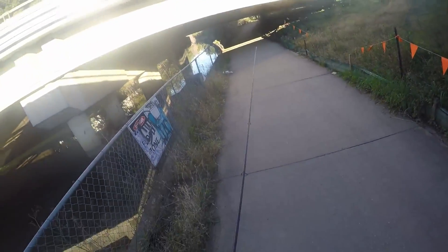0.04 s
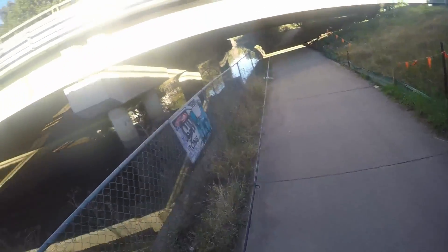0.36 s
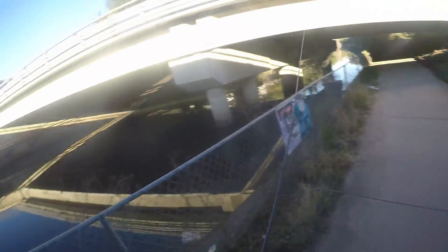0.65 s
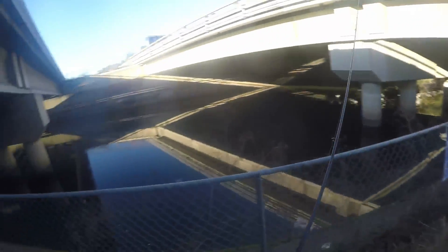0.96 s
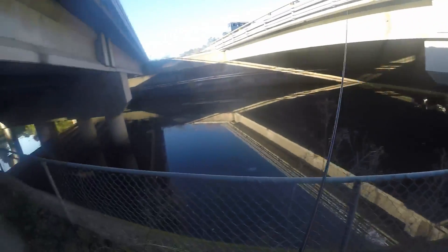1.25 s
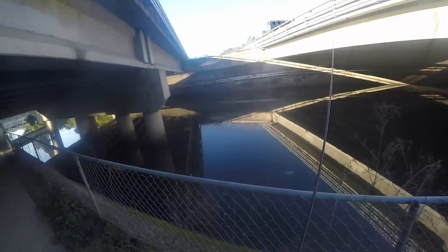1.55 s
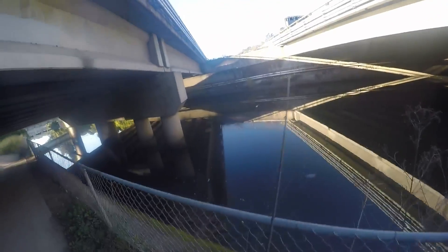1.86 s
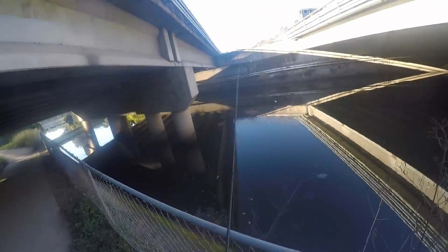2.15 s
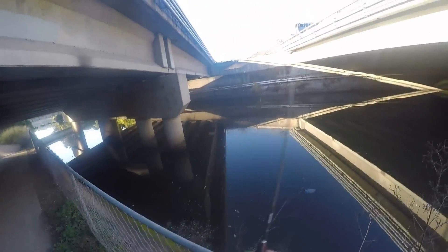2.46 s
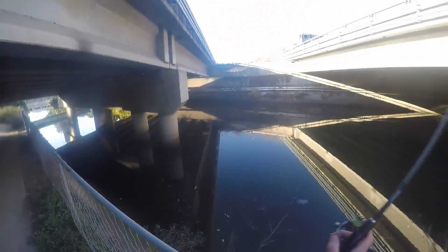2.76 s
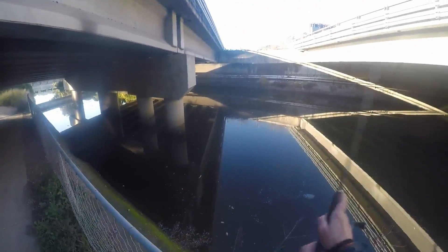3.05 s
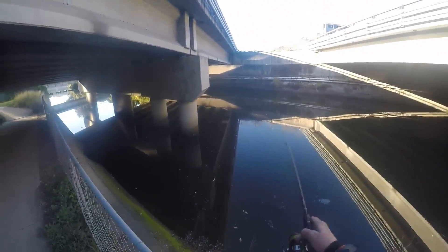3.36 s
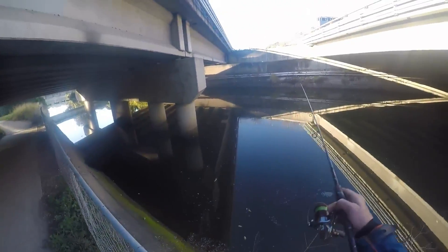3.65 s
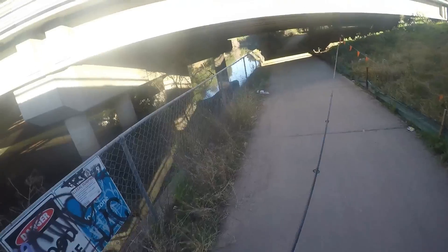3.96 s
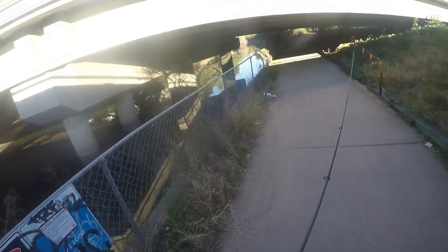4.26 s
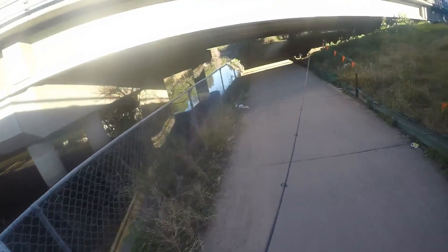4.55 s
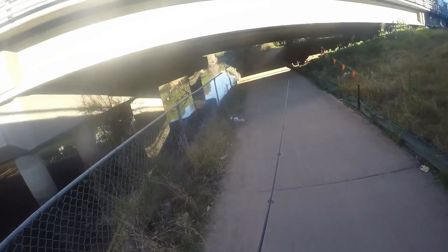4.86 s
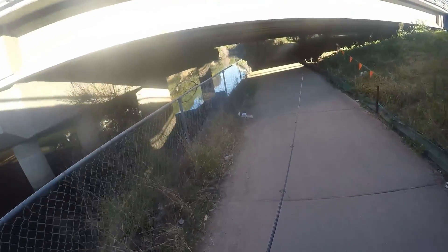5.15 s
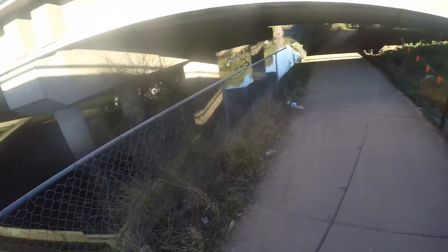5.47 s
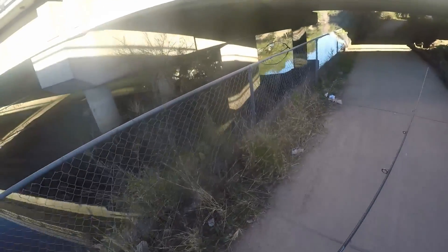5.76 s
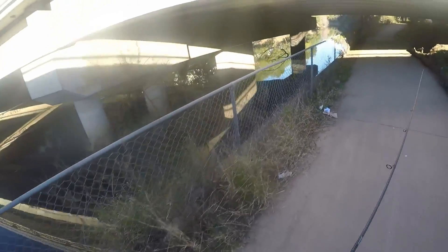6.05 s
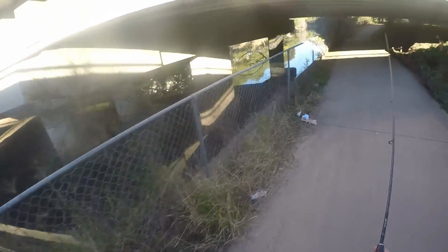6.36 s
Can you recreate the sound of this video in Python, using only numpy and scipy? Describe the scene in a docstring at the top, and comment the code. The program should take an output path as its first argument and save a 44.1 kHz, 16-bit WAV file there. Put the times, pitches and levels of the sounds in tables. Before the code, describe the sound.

Road traffic rumbles and roars on a bridge overhead as a droning truck passes, with one sharp click midway.

```python
"""Under a concrete road bridge

Traffic crosses above a path: the deck rumbles and booms, tyres roar and hiss. A truck passes overhead
on singing tyres, its exhaust droning on beside a slower lorry's. Nearby, fishing tackle ticks, line
runs off a reel and shoes scuff. The sound cuts out for an instant and comes back with a sharp click."""
import sys
import numpy as np
from scipy import signal
from scipy.fft import rfft, irfft, next_fast_len
from scipy.io import wavfile
from scipy.ndimage import uniform_filter1d, map_coordinates

SR = 44100
rng = np.random.default_rng(int(sys.argv[2]) if len(sys.argv) > 2 else 0)


def unload_wav(signal):
    """Save mono or channel-first audio to the path in sys.argv[1] as 16-bit WAV at rate SR, clipped to [-1, 1]."""
    wavfile.write(
        sys.argv[1],
        SR,
        np.round(np.clip(np.atleast_2d(signal).T, -1, 1) * 32767).astype(np.int16),
    )


N = 291501

SOUND_M_PER_S = 343
TRUCK_S, TRUCK_M_PER_S, TRUCK_M = 3.92, 18, 9  # time overhead, speed, least distance


def amp(db):
    """Decibels to gain."""
    return 10 ** (np.asarray(db) / 20)


def unit(x):
    """Scale to rms 1."""
    return x / np.sqrt(np.mean(x ** 2) + 1e-20)


def clock():
    """The time of every sample in seconds."""
    return np.arange(N) / SR


def fader(rows):
    """Straight ramps between (time, level) points."""
    return np.interp(clock(), *np.transpose(rows))


def swell(s, half_width):
    """A bell-shaped rise and fall around time s."""
    return np.exp(-((clock() - s) / half_width) ** 2)


def swells(rows):
    """A gain envelope with one swell per (t/s, level/dB, half-width/s) row."""
    return sum(amp(db) * swell(s, half_width) for s, db, half_width in rows)


def wobble(rate):
    """A smooth random curve, rate knots a second."""
    return map_coordinates(rng.standard_normal(int(N * rate / SR) + 4), [clock() * rate])


def filtered(x, response):
    """Equalise x with a gain that is a function of frequency."""
    size = next_fast_len(N + SR // 2)
    return irfft(rfft(x, size) * response(np.fft.rfftfreq(size, 1 / SR)), size)[:N]


def rush(colour, patchy_db):
    """Noise of rms 1 and the given (f/Hz, level/dB) colour, with random patches of +/- patchy_db."""
    bins = signal.stft(rng.standard_normal(N), nperseg=1024)[2]
    patches = uniform_filter1d(rng.standard_normal(bins.shape), size=5, axis=0)
    patches = uniform_filter1d(patches, size=10, axis=1)
    noise = signal.istft(bins * amp(patchy_db * unit(patches)), nperseg=1024)[1][:N]
    f, db = np.transpose(colour)
    return unit(filtered(noise, lambda hz: amp(np.interp(np.log(hz + 1), np.log(f), db))))


def tones(pitch_hz, partials, scatter, rate):
    """(Ratio, dB) partials on a moving pitch; echoes off the concrete add a wandering share, scatter."""
    phase = 2 * np.pi * np.cumsum(pitch_hz) / SR
    out = np.zeros(N)
    for ratio, db in partials:
        paths = 1 + scatter * (wobble(rate) + 1j * wobble(rate))
        carrier = np.exp(1j * (ratio * phase + rng.uniform(0, 2 * np.pi)))
        out += amp(db) * unit(np.real(paths * carrier))
    return out


def passing(s, m_per_s, distance_m):
    """Doppler ratio and nearness (1 when closest) of a vehicle that passes at time s."""
    along = m_per_s * (clock() - s)
    range_m = np.hypot(along, distance_m)
    return 1 - m_per_s / SOUND_M_PER_S * along / range_m, distance_m / range_m


def electronics():
    """The noise floor of the electronics: a faint, even hiss and a high whine."""
    # hiss colour: f/Hz, level/dB
    colour = [(1000, -0.5), (9000, -1.5), (13000, -2), (14500, -5), (15200, -8), (15600, -45.5)]
    hiss = amp(-72.5) * rush(colour, patchy_db=1.5)
    whine = amp(-91) * (1 + .6 * wobble(40)) * np.sin(2 * np.pi * 12851 * clock())
    return hiss + whine


def fishing_line():
    """Line whistles off the reel, sinking in pitch as it slows, then hisses out through the rod's rings."""
    # line rubbing the rings: f/Hz, level/dB
    cast_colour = [(3000, -25), (5800, 10), (8000, -6.5), (10000, -5), (15000, -11), (15600, -46)]
    whistle_s, cast_s, cast_length_s = 2.45, 3.03, 0.82
    top_hz, sag_hz_per_s = 12851, 11000
    since = clock() - whistle_s
    whistle_db = -75.5 + np.minimum(27 * since, -90 * since)  # slow rise, quick fall
    pitch_hz = np.clip(top_hz - sag_hz_per_s * since, top_hz / 2, top_hz)
    whistle = amp(whistle_db) * tones(pitch_hz, [(1, 0.0051)], scatter=10, rate=550)
    running = (clock() > cast_s) & (clock() < cast_s + cast_length_s)
    cast = running * amp(-70 + 1.6 * wobble(40)) * rush(cast_colour, patchy_db=-0.5)
    return whistle + cast


def shoes():
    """Soles scuff grit on the concrete path."""
    # scuffs: t/s, level/dB, half-width/s
    scuffs = [(5.15, -65, 0.03), (6.06, -70, 0.07), (6.444, -69, 0.03)]
    # grit colour: f/Hz, level/dB
    colour = [(2500, -20), (4500, -3), (5600, -6), (6500, -11.5), (8500, -18), (14000, -33)]
    grit = unit(amp(5 * wobble(240)) * rush(colour, patchy_db=3))
    return grit * swells(scuffs)


def tackle():
    """Small parts of rod and reel tick: each contact is a few short modes and a dry, bright snap."""
    # contacts: t/s, relative level/dB, brightness/(dB per octave), low cut/Hz, attack/s
    ticks = [(1.8583, -42, 4, 5200, .00005), (1.8593, -37, -7, 5300, .0001),
             (1.8755, -44, -3.5, 7000, .0003), (3.9123, -45, -6, 4300, .0003),
             (3.9213, -44, -6, 4300, .0004), (4.8358, -43, 3, 5200, .0002),
             (4.8364, -34.5, -3, 3800, .0006), (5.1013, -48.5, -2, 3900, .0005),
             (6.428, -47, -5, 5200, .0005), (6.455, -49, -5, 5200, .0005)]
    # modes of the parts: f/Hz, level/dB, t60/s
    modes = [(4030, -1, .008), (4400, -3, .007), (4750, -2, .009), (5100, -5, .008), (5480, -1, .014),
             (7950, -9, .006), (10400, -14, .005), (12800, -8, .005), (13600, -13, .003)]
    pivot_hz, snap_db, snap_t60 = 5000, -19, .005
    out, t = np.zeros(N + SR), np.arange(SR // 10) / SR
    for s, db, bright_db, lowest_hz, attack in ticks:
        ring = np.zeros(len(t))
        for hz, mode_db, t60 in modes:
            struck_db = mode_db + bright_db * np.log2(hz / pivot_hz) + rng.normal(0, 2.1)
            low_cut = 1 / (1 + (lowest_hz / hz) ** 20)
            ring += low_cut * amp(struck_db - 60 * t / t60) * np.sin(2 * np.pi * hz * t)
        snap = amp(snap_db + bright_db - 60 * t / snap_t60) * np.gradient(rng.standard_normal(len(t)))
        out[round(s * SR):][:len(t)] += amp(db) * (ring + snap) * (1 - np.exp(-t / attack))
    return out[:N]


def deck_rumble():
    """The flow of cars shakes the deck into a low, continuous bed."""
    # rumble colour: f/Hz, level/dB
    colour = [(5.9, -46), (10, -12.5), (43, -2), (64, 1.5), (88, -4.5), (112, -6.5), (135, -16.5),
              (220, -15.5), (290, -27), (480, -120)]
    # rumble fader: t/s, relative level/dB
    levels = [(0.0, -37.5), (0.8, -34.5), (1.2, -36.5), (1.5, -33), (2.7, -30), (3.4, -32.5), (4.0, -28),
              (6.6, -33)]
    return amp(fader(levels) + 3.5) * rush(colour, patchy_db=0)


def road_roar():
    """The road roars through the underpass as the traffic builds and eases."""
    # roar colour: f/Hz, level/dB
    colour = [(70, -38.5), (120, -1.5), (200, -1.5), (300, -2), (400, 0), (500, -2), (600, -7), (760, -15),
              (870, -21), (1120, -22), (1300, -32.5), (2000, -61.5), (14000, -62.5), (15600, -93.5)]
    # roar fader: t/s, relative level/dB
    levels = [(0.0, -34), (0.7, -35), (1.5, -32), (2.6, -28.5), (3.8, -26.5), (5.1, -31), (6.6, -28.5)]
    return amp(fader(levels) - 2) * rush(colour, patchy_db=1.25)


def tyre_hiss():
    """Tyres on concrete hiss over the parapet; their bright edge fizzes through the gap between decks."""
    # hiss, shaded by the parapet: f/Hz, level/dB
    hiss_colour = [(700, -37), (1300, 0.5), (1750, 3), (2300, 2.5), (2750, 2), (3100, 0.5), (3400, -12.5),
                   (4500, -33.5), (8000, -43.5)]
    # fizz through the gap: f/Hz, level/dB
    fizz_colour = [(2500, -20.5), (3400, 0.5), (4200, 2.5), (5000, -1.5), (6000, -8.5), (7500, -16.5),
                   (10000, -29), (15000, -40)]
    # hiss fader: t/s, relative level/dB
    levels = [(0.1, -60), (0.86, -58.5), (1.17, -55.5), (1.42, -54), (1.6, -54), (1.9, -53), (2.4, -53),
              (2.9, -52), (3.25, -52), (4.54, -57), (4.99, -57), (6.6, -54)]
    # tyres swishing past: t/s, boost/dB, half-width/s
    swishes = [(1.197, 2.4, 0.049), (1.62, 2.3, .05), (2.387, 2, .06), (3.2, 0.5, .08), (5.528, 2.5, .06)]
    hiss_db = fader(levels) + sum(db * swell(s, half_width) for s, db, half_width in swishes)
    facing_gap_db = 3.5 * swell(2.3, 0.56)  # brighter while the listener faces the gap
    fizz_db = -64 + 0.88 * (hiss_db - hiss_db.mean()) + facing_gap_db
    hiss = amp(hiss_db + 0.34 + 0.23 * wobble(12)) * rush(hiss_colour, patchy_db=1.5)
    fizz = amp(fizz_db) * rush(fizz_colour, patchy_db=1)
    return hiss + fizz


def span_heaves():
    """The span flexes under heavy loads in slow sub-bass swells."""
    # loads: t/s, level/dB, half-width/s
    loads = [(2.709, -31.5, 0.22), (4.15, -36.5, 0.25), (4.6, -31, 0.092), (5.35, -32.5, 0.37)]
    # colour of the flexing span: f/Hz, level/dB
    colour = [(15, -27.5), (26, 12.5), (44, 11.5), (54, -7), (80, -44), (160, -120)]
    return swells(loads) * rush(colour, patchy_db=-4)


def axle_booms():
    """Axles set the low modes of the deck swelling and fading."""
    # axles: t/s, level/dB, half-width/s
    axles = [(1.304, -28, 0.036), (1.643, -28, 0.066), (2.339, -26.5, 0.055)]
    # deck modes: f/Hz, relative level/dB
    modes = [(57, -8), (82, -1), (93, 1)]
    out = np.zeros(N)
    for s, db, half_width in axles:
        ring = sum(amp(level) * np.sin(2 * np.pi * (hz * clock() + rng.uniform())) for hz, level in modes)
        out += amp(db) * swell(s, half_width) * ring
    return out


def wheel_surges():
    """Short swells of roar and hollow boom as wheels cross a rough stretch."""
    # crossings: t/s, roar level/dB, boom level/dB, half-width/s
    crossings = [(0.414, -39, -62, 0.1), (2.676, -32.5, -46, 0.11), (3.244, -41, -36, 0.18),
                 (3.69, -31, -30, 0.15), (4.952, -31, -48, 0.038), (5.427, -37.5, -49, 0.25)]
    # roar of the wheels: f/Hz, level/dB
    roar_colour = [(250, -29.5), (380, 7), (490, 9), (580, -7.5), (800, -30.5), (1600, -72.5), (3000, -120)]
    # hollow boom of the span: f/Hz, level/dB
    boom_colour = [(90, -31), (128, 4), (170, -12.5), (220, -24.5), (900, -120)]
    roar_gain = swells((s, db, half_width) for s, db, _, half_width in crossings)
    boom_gain = swells((s, db, half_width) for s, _, db, half_width in crossings)
    return roar_gain * rush(roar_colour, patchy_db=1.5) + boom_gain * rush(boom_colour, patchy_db=-4.5)


def lorry_overtones():
    """Overtones of the lorry's drone swell briefly, sinking a little in pitch."""
    # swelling overtones: t/s, f/Hz, level/dB, half-width/s
    hums = [(3.28, 166, -36.5, 0.32), (5.501, 229.5, -38, 0.39), (6.198, 156.5, -34, 0.64)]
    sag_hz_per_s = 7
    out = np.zeros(N)
    for s, hz, db, half_width in hums:
        pitch_hz = hz - sag_hz_per_s * (clock() - s)
        out += amp(db) * swell(s, half_width) * tones(pitch_hz, [(1, 0)], scatter=.18, rate=8.7)
    return out


def lorry_exhaust():
    """A slower lorry drones below the truck, brighter when louder, its pitch sinking as it passes."""
    # harmonics of the firing rate, first upwards: level/dB
    harmonics = [0, -18.5, -24]
    # drone fader: t/s, relative level/dB
    levels = [(0.0, -33), (2.9, -37), (3.3, -23.5), (3.9, -27.5), (4.6, -33.5), (5.2, -25.5), (5.8, -22),
              (6.6, -24)]
    firing_hz = 78.78
    doppler, _ = passing(s=3.4, m_per_s=12, distance_m=12.6)
    drone_db = fader(levels)
    edge_db = 0.21 * (drone_db - drone_db.max())
    partials = [(k, db + edge_db * (k > 1)) for k, db in enumerate(harmonics, 1)]
    return amp(drone_db - 3.5) * tones(firing_hz * doppler, partials, scatter=.26, rate=9)


def truck_exhaust():
    """The truck's exhaust comes into the open once it has passed, sinking and dulling with distance."""
    # harmonics of the firing rate, first upwards: level/dB
    harmonics = [0, -29, -14, -18]
    firing_hz, exposed_s, rise_s = 97.84, 3.94, 0.046
    doppler, near = passing(TRUCK_S, TRUCK_M_PER_S, TRUCK_M)
    exposed = (1 + np.tanh((clock() - exposed_s) / rise_s)) / 2
    dip_db = -12.5 * swell(4.656, 0.16)  # the drone dips briefly
    gain = amp(-21 + dip_db) * exposed * near ** 0.63
    edge_db = 20 * np.log10(near)  # overtones fade faster than the fundamental
    partials = [(k, db + edge_db * (k > 1)) for k, db in enumerate(harmonics, 1)]
    return gain * tones(firing_hz * doppler, partials, scatter=0.082, rate=14)


def truck_tyres():
    """The tread sings: a clear, falling note comes in swells inside a rough whine that peaks overhead."""
    # tones from tread blocks of several lengths: pitch ratio, level/dB
    tread_tones = [(.8, -3.5), (.9, -7), (1, -2), (1.05, -7), (1.19, -10.5), (1.31, -12.5)]
    # swells of the clear note: t/s, level/dB, half-width/s
    note_swells = [(3.464, -35, .1), (3.78, -26, 0.11), (4.226, -27, 0.12), (5.549, -37.5, .5)]
    whine_hz, note_hz = 367, 366.3
    doppler, near = passing(TRUCK_S, TRUCK_M_PER_S, TRUCK_M)
    wheel_doppler, _ = passing(s=4.0, m_per_s=TRUCK_M_PER_S, distance_m=5.52)
    ahead_db = -8.5 * (clock() < TRUCK_S) * (1 - near ** 2)  # tyres radiate less forwards
    whine = tones(whine_hz * doppler, tread_tones, scatter=2.1, rate=36)
    note = tones(note_hz * wheel_doppler, [(1, 0)], scatter=.62, rate=36)
    return amp(-30 + ahead_db) * near ** 1.75 * whine + swells(note_swells) * note


def scene():
    """The mono mix on the path under the bridge."""
    bed = deck_rumble() + road_roar() + tyre_hiss()
    vehicles = truck_exhaust() + lorry_exhaust() + lorry_overtones() + truck_tyres()
    bridge = axle_booms() + span_heaves() + wheel_surges()
    foley = tackle() + fishing_line() + shoes()
    return (bed + vehicles + bridge + foley + electronics())[None]


def record(dry):
    """The signal drops out briefly and snaps back with a click; a steep low-pass trims the top."""
    gap_start_s, gap_end_s = 3.8638, 3.9085
    click_hz, click_t60, top_hz = 900, .0019, 16200
    t = clock()
    live = (t < gap_start_s) | (t >= gap_end_s)
    gate = uniform_filter1d(live.astype(float), size=16)
    end_fades = signal.windows.tukey(N, .001)
    since = np.maximum(t - gap_end_s, 0)
    attack = 1 - np.exp(-since * SR / 2)  # two-sample time constant
    click = -amp(-11.3 - 60 * since / click_t60) * attack * np.cos(2 * np.pi * click_hz * since)
    mix = dry[0] * gate * end_fades + click
    return filtered(mix, lambda hz: 1 / np.sqrt(1 + (hz / top_hz) ** 120))[None]


dry = scene()
out = record(dry)
unload_wav(out)
```